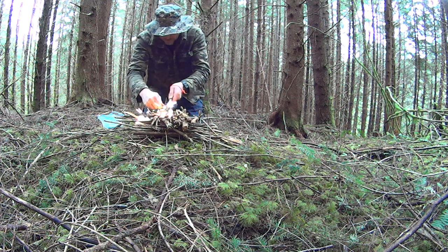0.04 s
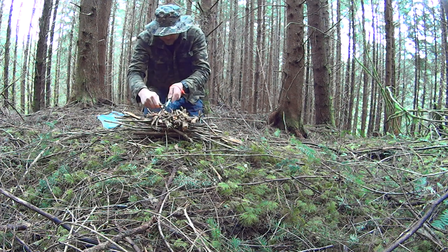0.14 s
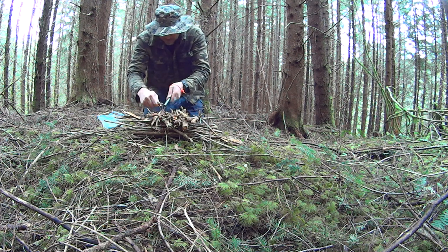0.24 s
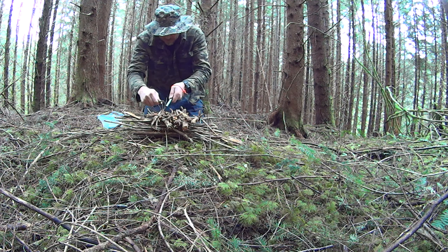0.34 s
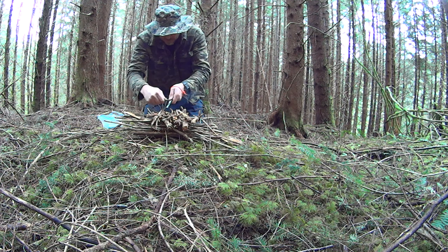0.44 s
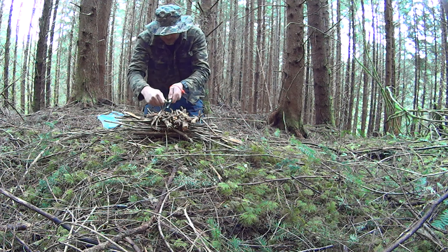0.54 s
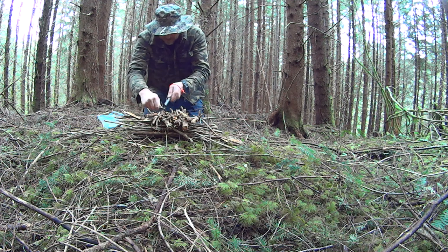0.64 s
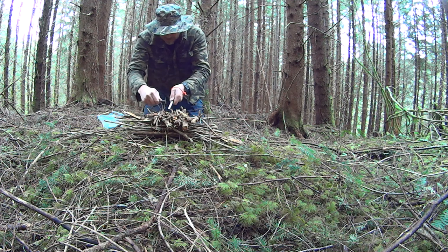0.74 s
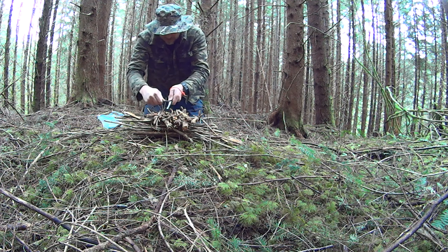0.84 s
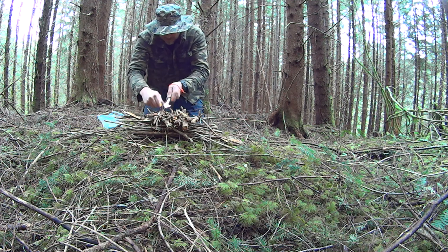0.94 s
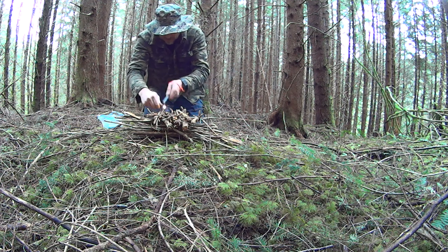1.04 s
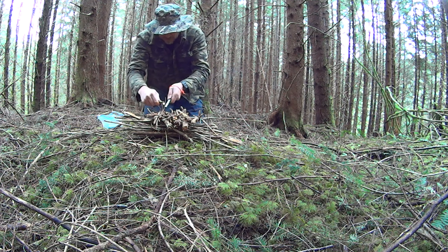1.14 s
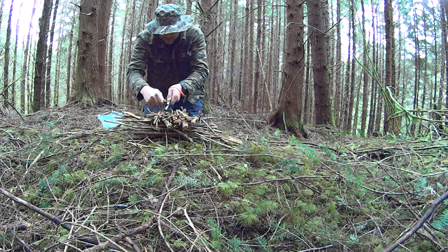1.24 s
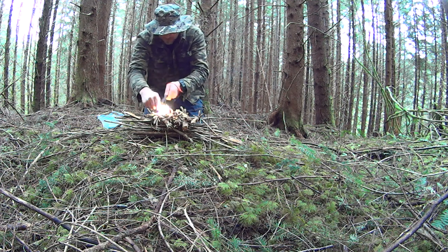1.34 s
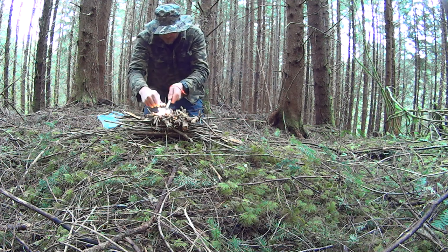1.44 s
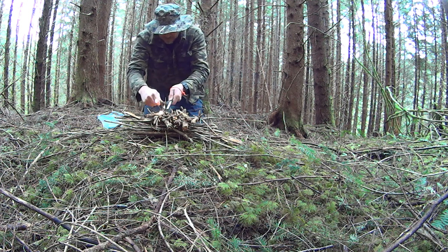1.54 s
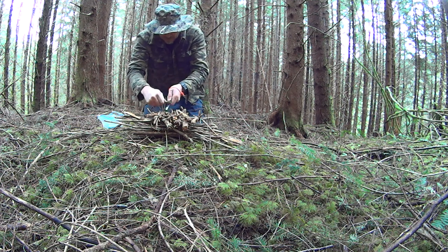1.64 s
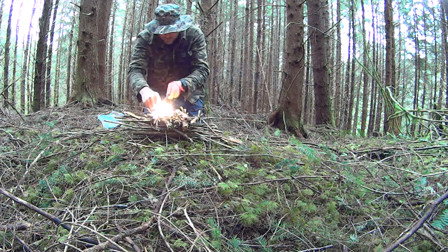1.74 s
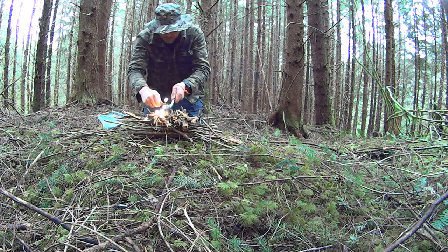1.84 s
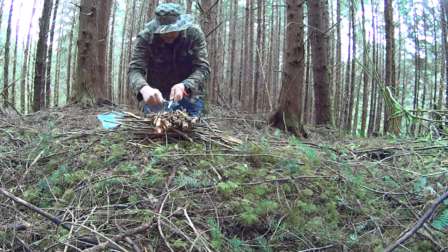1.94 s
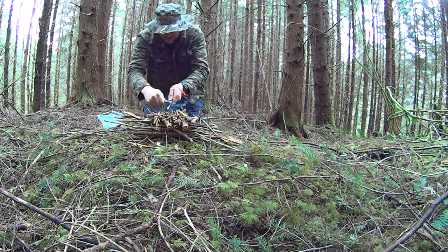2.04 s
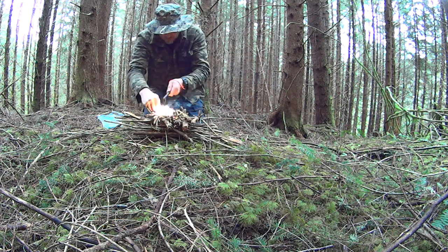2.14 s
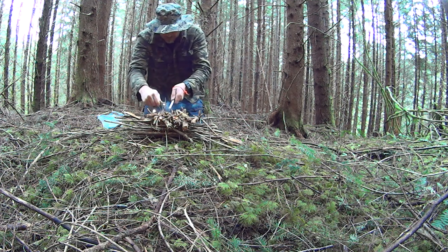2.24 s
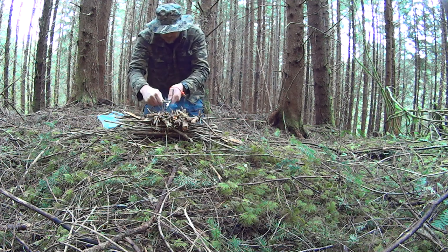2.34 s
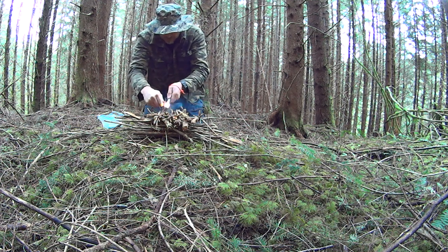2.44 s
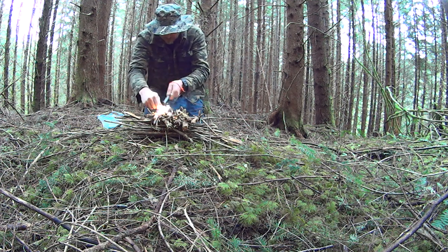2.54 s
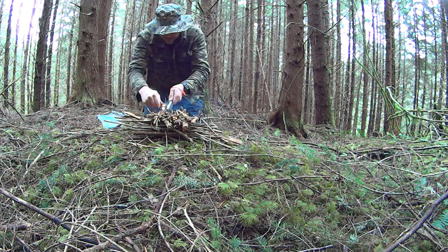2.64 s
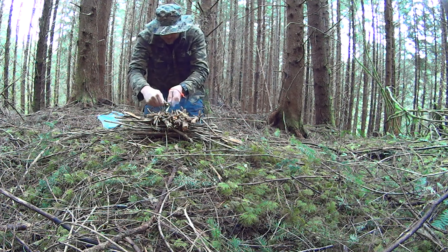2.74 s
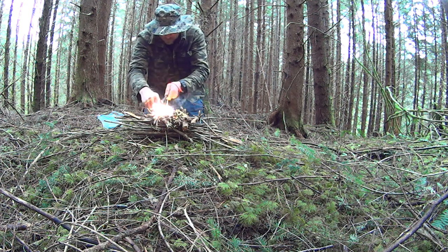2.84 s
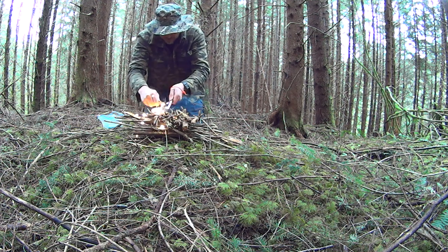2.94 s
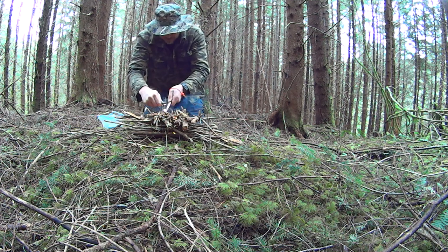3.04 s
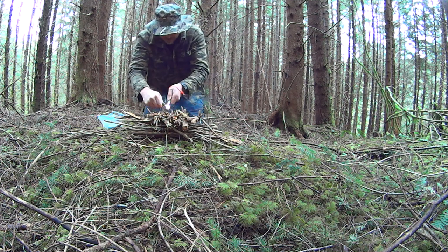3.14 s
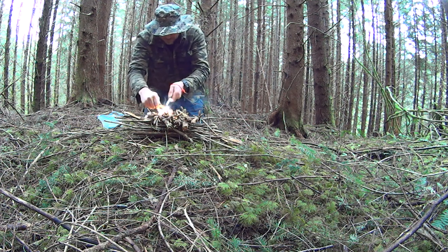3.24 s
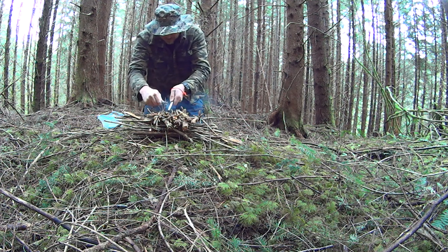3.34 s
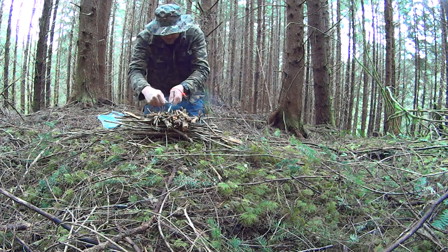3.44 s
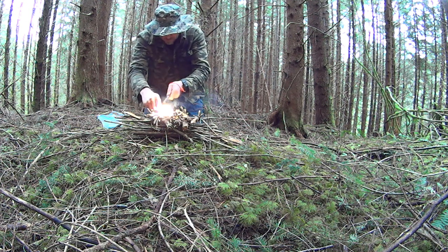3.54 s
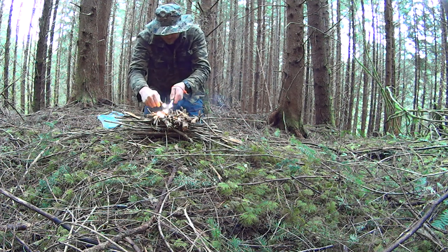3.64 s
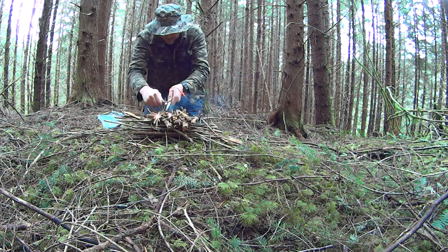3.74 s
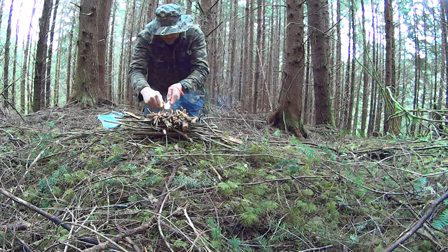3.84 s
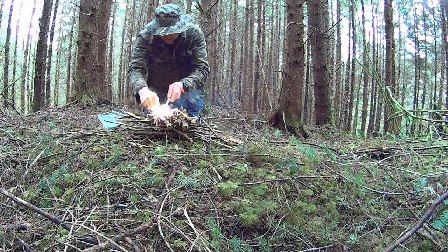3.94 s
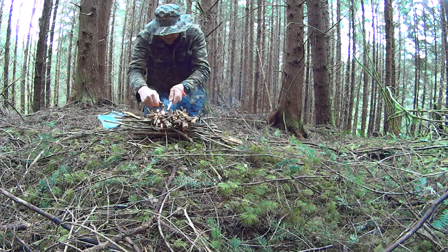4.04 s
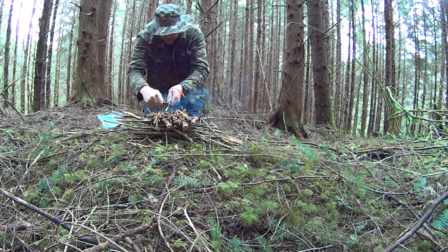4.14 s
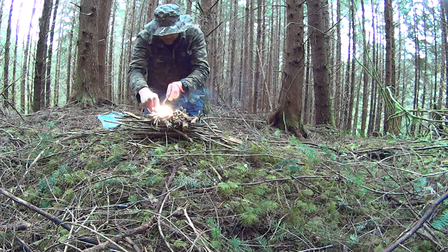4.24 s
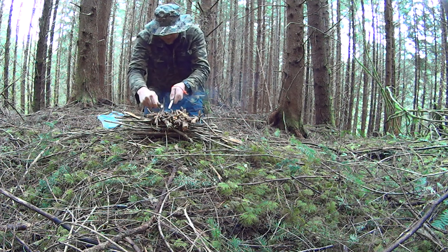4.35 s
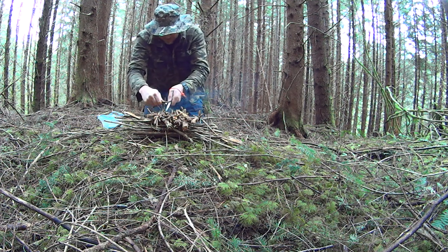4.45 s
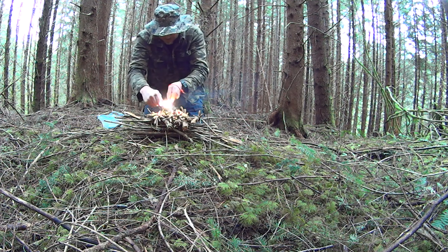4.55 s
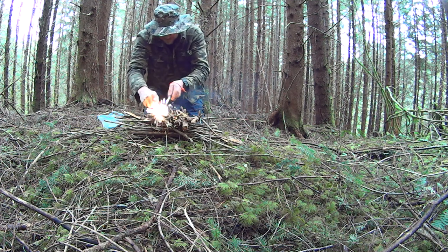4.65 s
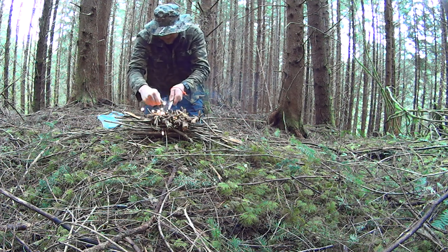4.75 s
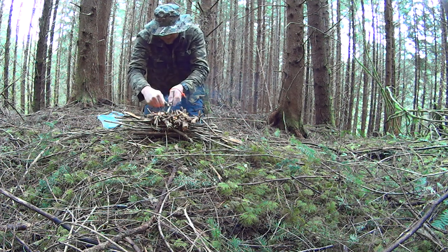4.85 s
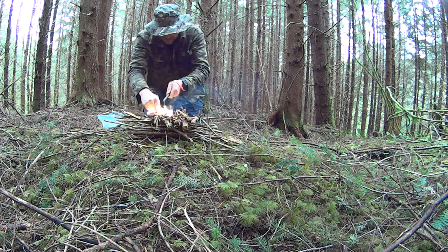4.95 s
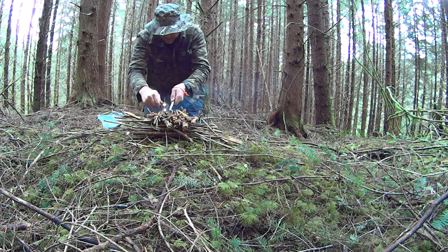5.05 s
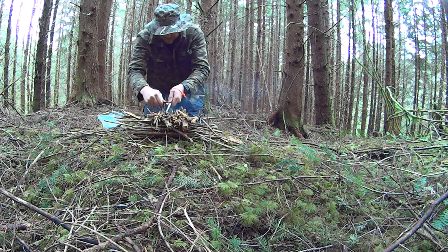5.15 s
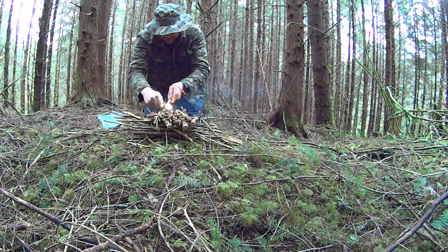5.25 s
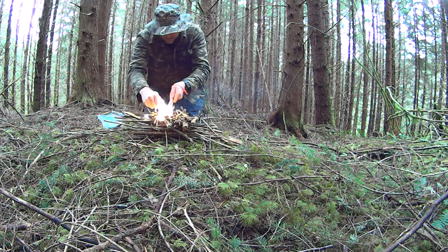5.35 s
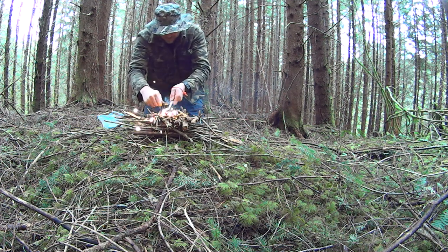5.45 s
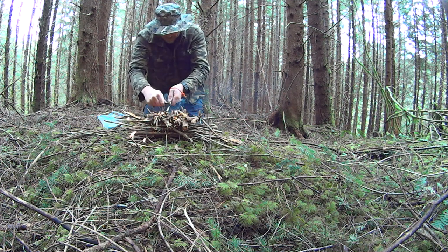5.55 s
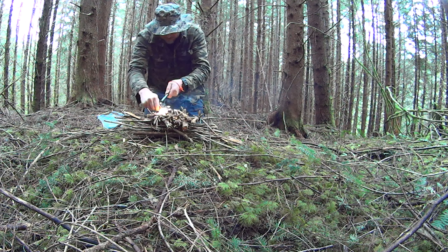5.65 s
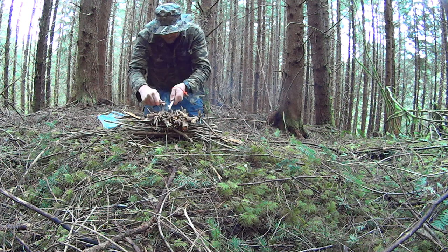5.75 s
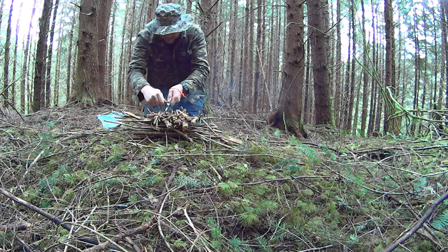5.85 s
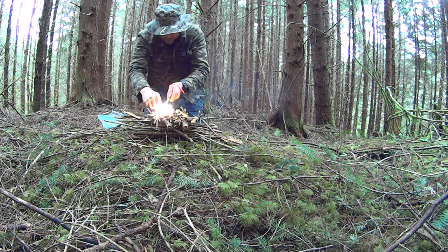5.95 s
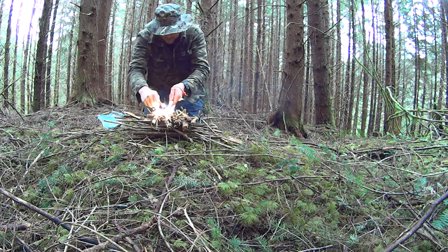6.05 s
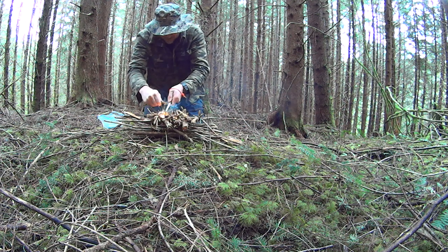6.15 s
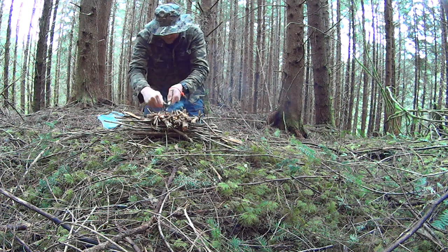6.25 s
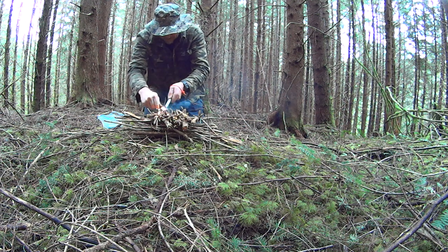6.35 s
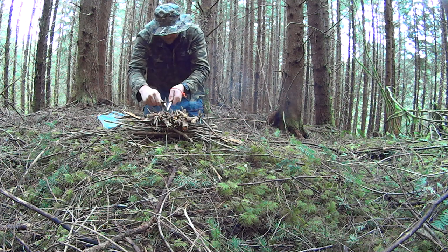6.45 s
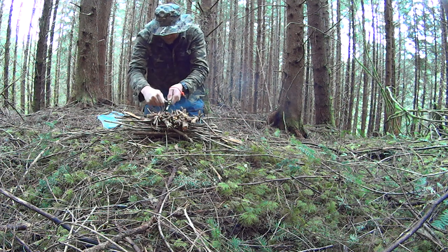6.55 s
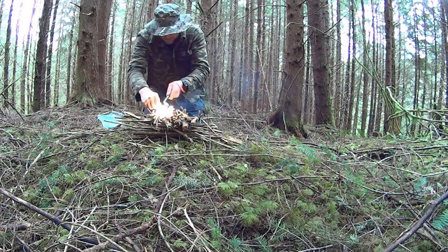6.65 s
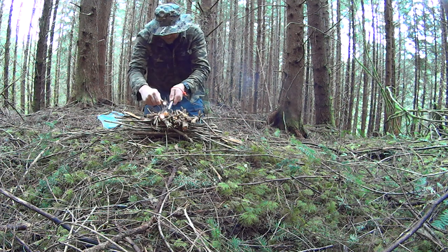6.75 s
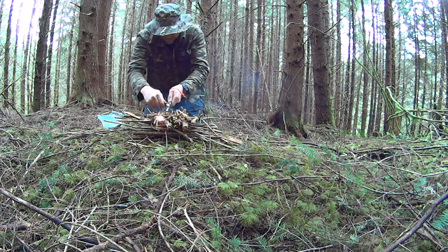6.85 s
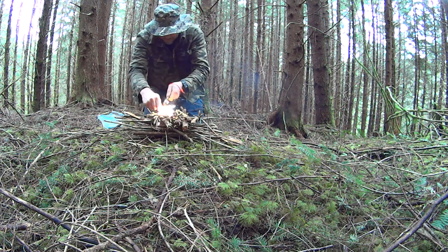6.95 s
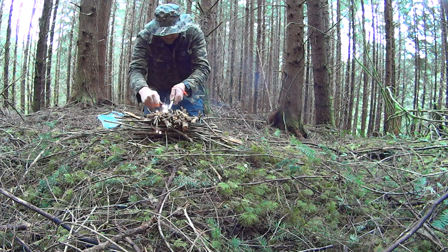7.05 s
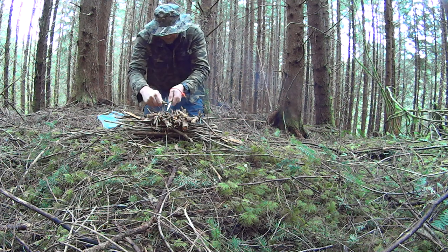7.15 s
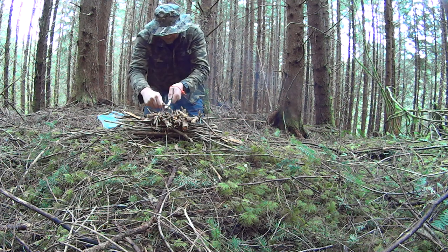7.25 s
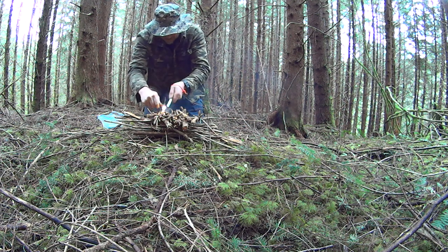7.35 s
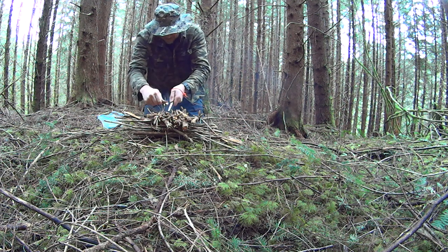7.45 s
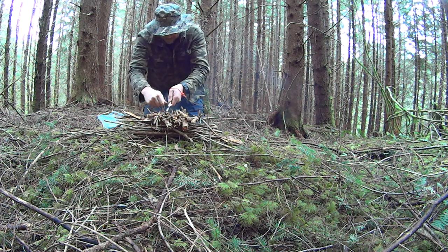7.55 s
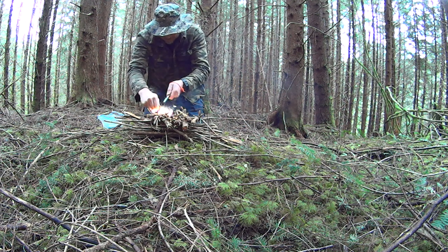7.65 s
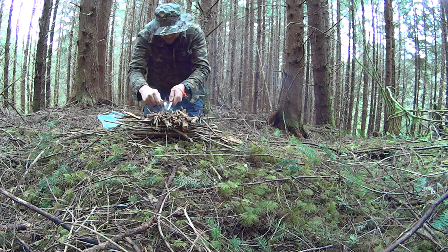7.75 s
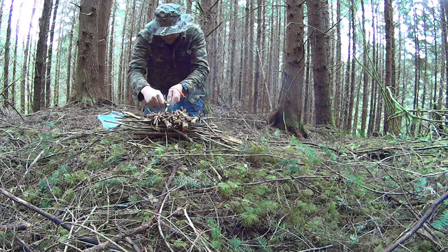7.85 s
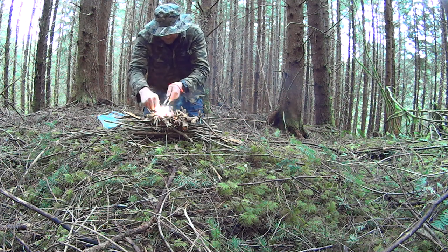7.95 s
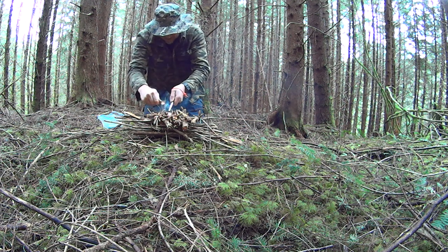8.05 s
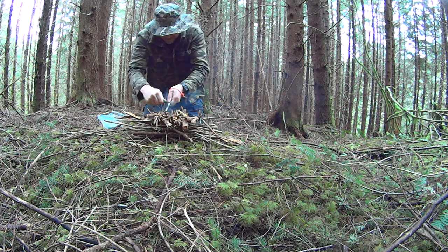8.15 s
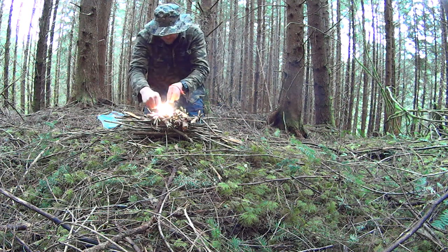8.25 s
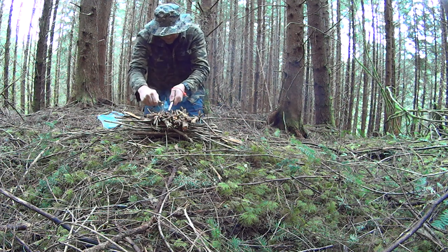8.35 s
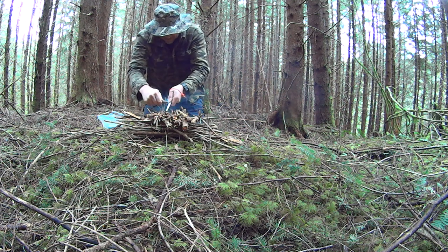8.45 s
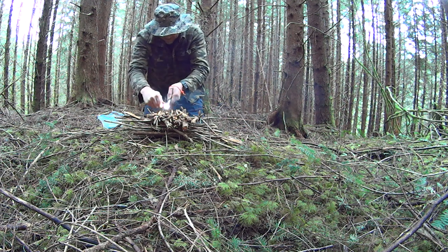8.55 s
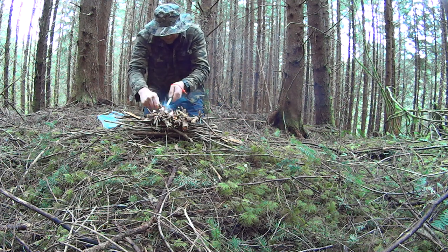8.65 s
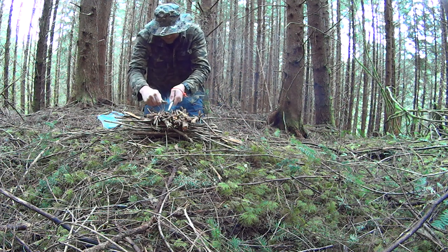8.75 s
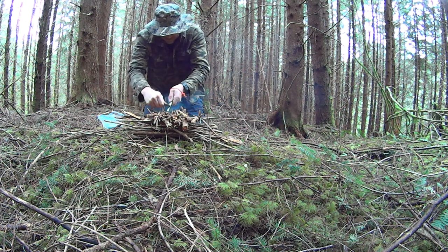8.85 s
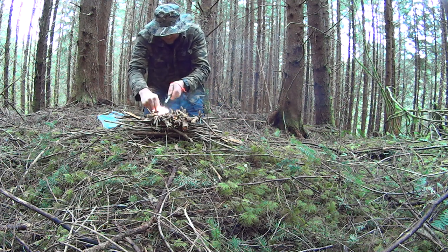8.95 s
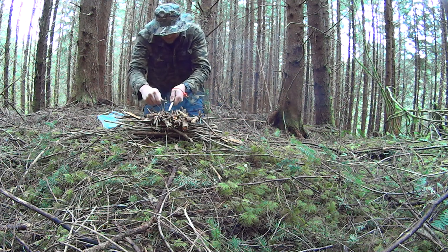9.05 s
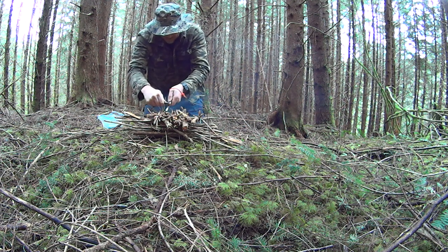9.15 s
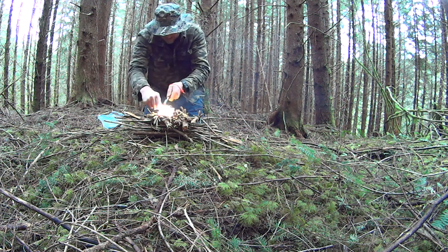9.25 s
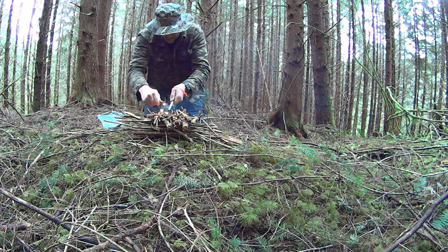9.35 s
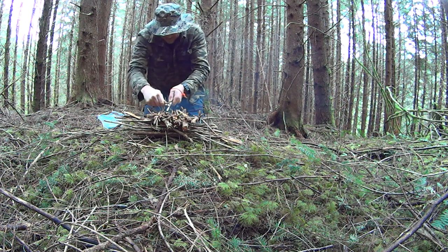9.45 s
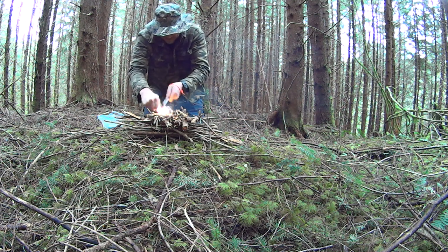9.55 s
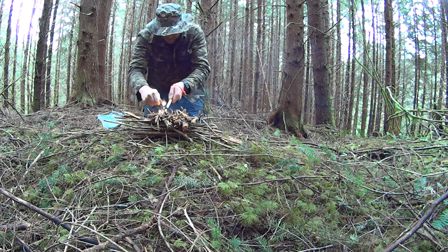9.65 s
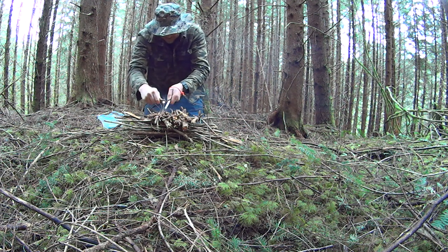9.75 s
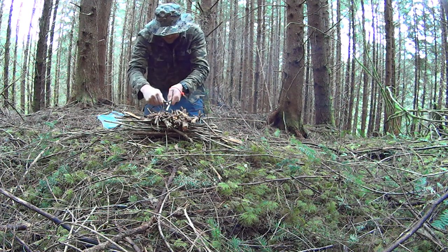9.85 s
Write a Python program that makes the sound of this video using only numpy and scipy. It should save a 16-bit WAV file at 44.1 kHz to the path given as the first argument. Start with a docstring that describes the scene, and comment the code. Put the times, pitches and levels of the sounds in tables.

```python
"""Quiet conifer wood: a steel striker is scraped down a ferrocerium rod about three times a second.
Each stroke: the steel taps onto the rod (struck partials), slides (soft grains through a steel resonance),
bites (dense grains through rod resonances, plus a stick-slip squeak), and the shavings flare in a
crackling puff of noise. Stray sparks tick as decaying noise, the ground and trunks answer faintly,
and the forest hushes behind it all as wide, nearly steady noise."""
import sys
import numpy as np
from scipy import signal
from scipy.fft import rfft, irfft, next_fast_len
from scipy.io import wavfile
from scipy.ndimage import uniform_filter1d, map_coordinates

SR = 44100
rng = np.random.default_rng(int(sys.argv[2]) if len(sys.argv) > 2 else 0)


def int16_out(signal):
    """Quantize to a 16-bit WAV file."""
    q = np.round(np.clip(np.atleast_2d(signal).T, -1, 1) * 32767)
    wavfile.write(sys.argv[1], SR, q.astype(np.int16))


N = 436590
TIME_S = np.arange(N) / SR

# Forest hush spectrum. Each row: frequency in Hz, relative level in dB.
FOREST_SPECTRUM = [(12, -55), (20, -13), (64, -3), (393, -7), (499, -2), (1140, -7.5), (1300, -4.5),
                   (1410, -9), (1790, -8), (2150, -11), (2400, -12.5), (3870, -16), (5610, -20),
                   (10600, -23), (11500, -50), (15000, -79), (22000, -120)]
# Forest stereo width. Each row: frequency in Hz, left-right correlation from 0 to 1.
FOREST_CORRELATION = [(60, 1), (140, 0.84), (350, 0.68), (840, 0.094), (2020, 0.16), (4860, 0.049),
                      (11700, 0.59)]
# Reverberation among the trunks. Each row: frequency in Hz, 60 dB decay time in seconds.
TRUNK_DECAY = [(300, 0.72), (4500, 0.38), (11000, 0.22)]
# Stereo level of the work. Each row: frequency in Hz, left minus right in dB.
LEFT_LEAN = [(350, .3), (2000, 1.7), (4200, 1.3), (8500, 1.8)]
# Stereo phase of the work. Each row: frequency in Hz, lead of the left channel in radians.
LEFT_LEAD = [(100, 0), (900, 0.63), (2400, 0.37), (4500, 0.33), (7000, 0.49), (11000, 0.25)]
# Sparks that pop, or fizz on in the tinder. Each row: start in seconds, nominal peak in dB,
# 60 dB decay time in seconds.
LOUD_SPARKS = [(.114, -29, 0.019), (.13, -34.5, 0.065), (.666, -28.5, 0.0098), (1.088, -33.5, .015),
               (1.363, -16.5, .02), (1.529, -30, 0.016), (1.888, -30, .015), (1.908, -27.5, 0.022),
               (2.849, -16.5, .015), (2.961, -30.5, 0.12), (3.643, -28, 0.019), (4.022, -31.5, .22),
               (4.073, -26.5, .015), (4.944, -14, .015), (5.408, -32.5, 0.091), (5.466, -30, 0.047),
               (6.509, -29, 0.011), (7.791, -28.5, 0.022), (7.909, -30, .01), (8.009, -26, .025),
               (8.031, -26, 0.0097), (8.98, -31, 0.13)]
# Burning shavings spectrum. Each row: frequency in Hz, relative level in dB.
BURN_SPECTRUM = [(30, -15), (90, -8.5), (180, -5.5), (320, -6.5), (540, -0.5), (720, -10.5), (950, -7.5),
                 (1600, -3.5), (2300, -1), (2900, -3), (3700, 0.5), (5800, -3.5), (6450, -7.5),
                 (7000, -3.5), (9000, -2), (11000, -4)]
# Light sliding spectrum. Each row: frequency in Hz, relative level in dB.
SLIDE_SPECTRUM = [(1200, -16), (2300, -3), (3500, -7), (4500, -8), (4900, -6), (5600, -13), (6400, -18),
                  (7300, -6), (8900, -9), (11000, -5.5)]
# Steel set down on the rod. Each row: start in seconds, ring level in dB, edge level in dB.
TAP_EVENTS = [(.083, -43.5, -44), (0.4856, -22.5, -26.5), (0.6157, -36, -42), (.894, -31, -34.5),
              (.986, -32, -34), (1.2647, -20.5, -26.5), (1.664, -24, -29.5), (2.0462, -21.5, -30.5),
              (2.4064, -20, -30.5), (2.7721, -25.5, -34.5), (3.1165, -22.5, -33), (3.207, -35, -32),
              (3.463, -23.5, -24.5), (3.8227, -24, -21.5), (4.1797, -20, -27), (4.5157, -20.5, -26),
              (4.8655, -19, -25), (5.2125, -20.5, -22), (5.5564, -20, -23.5), (5.888, -20, -22),
              (6.2389, -21.5, -22.5), (6.5509, -21, -21), (6.8853, -20.5, -28), (7.2178, -20, -26.5),
              (7.5467, -24, -21), (7.8705, -19, -23.5), (8.197, -21, -22), (8.526, -20, -24.5),
              (8.846, -20.5, -25.5), (9.182, -19.5, -27.5), (9.489, -22.5, -29), (9.675, -24.5, -23),
              (9.872, -19, -23)]
# Dull knock of the rod under each tap. Each row: frequency in Hz, relative level in dB.
KNOCK_SPECTRUM = [(200, -31), (1400, -16), (1850, -8.5), (2040, -15.5), (2270, 2.5), (2550, -9.5),
                  (2850, -2.5), (3100, -10.5), (3300, -0.5), (3620, 6.5), (3820, -5), (4050, 7),
                  (4500, -24), (6000, -17), (11000, -53)]
# Hand-damped steel and rod. Each row: frequency in Hz, relative level in dB.
RING_SPECTRUM = [(3000, -44.5), (4000, -18), (4380, 10), (4800, 12.5), (5130, 5.5), (5350, -9), (6300, -17),
                 (11000, -57)]
# Brighter contact edge. Each row: frequency in Hz, relative level in dB.
EDGE_SPECTRUM = [(3000, -38), (6350, -24), (6950, 2.5), (8200, 2.5), (8750, 10.5), (9600, -6), (10600, 5.5),
                 (12000, -24.5)]
# Squeak pitch, drifting with the grip. Each row: time in seconds, pitch in Hz before glide and jitter.
SQUEAK_PITCH = [(5.6, 2380), (5.95, 2219), (7.28, 2290), (7.61, 2615), (8.26, 2284), (8.59, 2285),
                (8.91, 2447), (9.25, 2209)]
# Pushes down the rod. Each row: bite in seconds, force in dB, delay from bite to flare in seconds,
# flare level in dB before trim, burn-out in seconds.
PUSHES = [(-.03, -44, 0.018, -33, 0.034), (.578, -41, 0.037, -42.5, 0.0043), (.962, -47, 0.033, -31, 0.011),
          (1.339, -39, 0.046, -33, 0.03), (1.741, -36.5, 0.024, -29.5, .023),
          (2.112, -33, 0.027, -30, .025), (2.475, -40.5, 0.027, -32, 0.034),
          (2.838, -33.5, 0.035, -30, 0.024), (3.185, -39, .025, -28, 0.018),
          (3.526, -35, 0.038, -32.5, 0.025), (3.885, -31, 0.022, -29, 0.024),
          (4.24, -35.5, 0.031, -32, 0.018), (4.577, -34.5, 0.022, -30, 0.037),
          (4.922, -33, 0.019, -32.5, 0.032), (5.276, -32, 0.025, -30.5, 0.04),
          (5.617, -25.5, 0.021, -30, 0.023), (5.947, -26.5, 0.019, -30, 0.041),
          (6.297, -27, 0.016, -33, 0.026), (6.617, -25, .04, -32, 0.042),
          (6.944, -27.5, 0.014, -28.5, 0.029), (7.279, -26.5, 0.021, -32, 0.02),
          (7.61, -22.5, 0.022, -30, 0.02), (7.937, -20.5, 0.017, -28, 0.015),
          (8.26, -21.5, 0.026, -28.5, 0.016), (8.587, -20, 0.025, -28.5, 0.013),
          (8.906, -20, .034, -31.5, .013), (9.246, -24, 0.013, -31.5, .022),
          (9.56, -20.5, 0.02, -31.5, .026)]
# Brief snags of the edge before it bites. Each row: time in seconds, level in dB.
SNAG_EVENTS = [(.949, -39), (2.805, -35.5), (3.503, -30), (4.56, -38), (6.598, -41)]
# Rod resonances while the edge is pressed in. Each row: centre in Hz, width in Hz, relative level in dB.
ROD_MODES = [(1720, 500, -4), (2278, 190, 9.5), (2620, 420, 2), (2780, 46, 5.5)]
# Grit of the tearing edge. Each row: frequency in Hz, relative level in dB.
GRIT_SPECTRUM = [(1820, -29), (3100, -4.5), (3540, -7), (4010, -2), (4430, -13.5), (4860, 2), (5450, -9.5),
                 (6220, -14.5), (6870, -8.5), (8010, -11.5), (9080, -7), (9920, -8.5), (11000, -13.5),
                 (11300, -43), (11500, -30), (15000, -79), (22000, -120)]

# *_GROWS: dB of level per dB of force (for the knock, per dB of ring).
TOP_HZ = 11130
FOREST_DB = -52.5
STRAY_DB, STRAY_SPREAD_DB, STRAY_FLIGHT_S = -41.5, 2.5, (.04, .13)
FLARE_TRIM_DB, KINDLE = 1.5, .44  # KINDLE: rise time as a share of the delay from bite to flare
HARD_DB = -22.5  # force of a hard push, reference for the levels below
SLIDE_DB, SLIDE_GROWS, SLIDE_LEAD_S = -41, .42, .018
SLIDE_RISE_S, SLIDE_FALL_S = .017, .015
SING_HZ, SING_WIDTH_HZ, SING_DB, SING_RISE_S = 4870, 300, -54, .015
FIRM_TAP_DB, KNOCK_DB, KNOCK_GROWS = -18.5, -30.5, .35
SQUEAK_DB, OVERTONES_DB, SQUEAK_GROWS = -25, -9.5, 1.26
BITE_S, BITE_HALVES_DB, BITE_RELEASE = .00485, 17, .9  # hard half-width, force that halves it, fall / rise
BODY_DB, GRIT_DB, GRIT_GROWS = -3, -27.5, .88  # BODY_DB: rod resonance relative to the force
GRIT_RISE, GRIT_FALL = 1, 1.36  # times the bite's half-width
SNAG_RISE_S, SNAG_FALL_S = .0015, .0076


def amp(db):
    """Decibels to gain."""
    return 10 ** (np.asarray(db) / 20)


def unit(x):
    """Scale to rms 1."""
    return x / np.sqrt(np.mean(x ** 2) + 1e-20)


def along(points, hz):
    """Interpolate (Hz, value) points on a log frequency axis."""
    f, v = np.transpose(points)
    return np.interp(np.log(hz + 1), np.log(f + 1), v)


def filtered(x, response):
    """Apply a complex response of frequency."""
    size = next_fast_len(N + SR // 2)
    return irfft(rfft(x, size) * response(np.fft.rfftfreq(size, 1 / SR)), size)[..., :N]


def coloured(x, spectrum):
    """Shape x by a (Hz, dB) spectrum, at rms 1."""
    return unit(filtered(x, lambda hz: amp(along(spectrum, hz))))


def resonance(hz, centre_hz, width_hz):
    """Second-order band-pass response, peak 1."""
    damping = 1j * hz * width_hz
    return damping / (centre_hz ** 2 - hz * hz + damping)


def wobble(knots_per_s):
    """Smooth random curve."""
    knots = rng.standard_normal(N // 8)
    return map_coordinates(knots, [TIME_S * knots_per_s], mode="mirror")


def add(track, start_s, sound):
    """Mix a sound into a track."""
    start = max(round(start_s * SR), 0)
    room = track[start:start + len(sound)]
    room += sound[:len(room)]


def swells(rows):
    """Gain curve of smooth humps (s, dB, rise s, fall s) whose powers add."""
    power = np.zeros(N)
    for s, db, rise_s, fall_s in rows:
        near = slice(*np.searchsorted(TIME_S, [s - 10 * abs(rise_s), s + 10 * abs(fall_s)]))
        t = TIME_S[near] - s
        power[near] += (amp(db) / np.cosh(t / np.where(t < 0, rise_s, fall_s))) ** 2
    return np.sqrt(power)


def grains(rate_hz, spread_db, hiss):
    """Random tiny impulses of uneven size over a smooth hiss, at rms 1."""
    hits = (rng.random(N) < rate_hz / SR) * np.sign(rng.standard_normal(N))
    sizes = amp(spread_db * np.clip(rng.standard_normal(N), -2, 2))
    return unit(unit(hits * sizes) + hiss * rng.standard_normal(N))


def struck(spectrum, chatter, settle_s, stretch, uneven_db):
    """One contact: impulse and decaying chatter through a minimum-phase colour, rms 1 over 5 ms."""
    size = 2048
    hz = np.fft.rfftfreq(size, 1 / SR) * (1 + stretch * rng.standard_normal())  # the grip retunes the steel
    # each contact spot favours other partials
    spot = map_coordinates(rng.standard_normal(100), [hz / 450], mode="mirror")
    cepstrum = irfft(np.log(amp(along(spectrum, hz) + uneven_db * spot)))
    cepstrum[1:size // 2] *= 2  # fold to causal
    cepstrum[size // 2 + 1:] = 0
    force = chatter * rng.standard_normal(size) * np.exp(-np.arange(size) / SR / settle_s)
    force[0] += 1
    sound = irfft(np.exp(rfft(cepstrum)) * rfft(force))
    return sound / np.sqrt(np.mean(sound[:SR // 200] ** 2))


def bite_width_s(force_db):
    """Half-width of a bite: the harder the push, the shorter."""
    return BITE_S * 2 ** ((HARD_DB - force_db) / BITE_HALVES_DB)


def forest():
    """Distant air in the treetops: nearly steady noise, its stereo correlation set per frequency."""
    mid_side = rng.standard_normal((2, N))

    def widen(hz):
        angle = np.arccos(np.clip(along(FOREST_CORRELATION, hz), -1, 1)) / 2
        return np.array([np.cos(angle), np.sin(angle)])

    mid, side = filtered(mid_side, widen)
    air = coloured(np.array([mid + side, mid - side]), FOREST_SPECTRUM)
    return air * amp(FOREST_DB) * amp(wobble(2.99) / 2)


def trunks(x):
    """Two near reflections, and a thin decaying noise tail scattered among the trees."""
    hz, t, z = signal.stft(rng.standard_normal((2, SR // 2)), SR, nperseg=256)
    decay = amp(-60 * t / along(TRUNK_DECAY, hz)[:, None])
    tail = signal.istft(z * decay, SR, nperseg=256)[1]
    mid, side = tail / np.linalg.norm(tail[0]) * amp([[-25], [-26]])
    scatter = signal.fftconvolve(x[None], np.array([mid + side, mid - side]), axes=1)[:, :N]
    near = [(.0083, -32), (.0178, -28)]  # s, dB
    return scatter + sum(amp(db) * np.pad(x, (round(s * SR), 0))[:N] for s, db in near)


def ground(x):
    """The mossy bank adds a close second copy and soaks up its treble."""
    delay_s = .0027
    moss = lambda hz: .35 / np.sqrt(1 + (hz / 5000) ** 8)
    return x + filtered(x, lambda hz: moss(hz) * np.exp(-2j * np.pi * hz * delay_s))


def sparks(strays_per_flare, t60_s):
    """Single specks pop or fizz as decaying noise: the loud ones, and faint strays flying from each flare."""
    strays = []
    for s, _, delay_s, *_ in PUSHES:
        for _ in range(strays_per_flare):
            start_s = s + delay_s + rng.uniform(*STRAY_FLIGHT_S)
            strays.append((start_s, STRAY_DB + STRAY_SPREAD_DB * rng.standard_normal(), t60_s))
    pops = np.zeros(N)
    t = np.arange(SR // 6) / SR
    crest_db = 5.5  # allowance from noise rms to peak
    for s, db, life_s in LOUD_SPARKS + strays:
        add(pops, s, amp(db - crest_db - 60 * t / life_s) * rng.standard_normal(len(t)))
    return filtered(pops, lambda hz: 1j * hz / (2200 + 1j * hz))  # high-pass


def flares():
    """Hundreds of burning specks merge into a sputtering puff after each bite."""
    sputter = amp(1.8 * wobble(220) + 1.4 * wobble(80))
    burning = unit(grains(rate_hz=5000, spread_db=4, hiss=.57) * sputter)
    blaze = swells([(s + delay_s, db, KINDLE * delay_s, burn_out_s)
                    for s, _, delay_s, db, burn_out_s in PUSHES])
    return coloured(burning, BURN_SPECTRUM) * amp(FLARE_TRIM_DB) * blaze


def slides():
    """Before each bite the edge slides lightly, its grains keeping a steel resonance singing."""
    rubbing = coloured(grains(rate_hz=1200, spread_db=5, hiss=.4), SLIDE_SPECTRUM)
    sliding = unit(rubbing * amp(3 * wobble(160)))
    contact = swells([(s - SLIDE_LEAD_S, SLIDE_DB + SLIDE_GROWS * (force_db - HARD_DB),
                       SLIDE_RISE_S, SLIDE_FALL_S) for s, force_db, *_ in PUSHES])
    singing = unit(filtered(sliding, lambda hz: resonance(hz, SING_HZ, SING_WIDTH_HZ)))
    touch = swells([(s - SLIDE_LEAD_S, SING_DB, SING_RISE_S, SLIDE_FALL_S) for s, *_ in PUSHES])
    return sliding * contact + singing * touch


def taps():
    """The steel lands on the rod: dull knock, hand-damped ring and bright edge in one short contact."""
    out = np.zeros(N)
    build_up_s, settle_s = .0004, .0008
    for s, ring_db, edge_db in TAP_EVENTS:
        knock_db = KNOCK_DB + KNOCK_GROWS * (ring_db - FIRM_TAP_DB)
        knock = struck(KNOCK_SPECTRUM, .08, settle_s, stretch=.016, uneven_db=2.8)
        ring = struck(RING_SPECTRUM, .06, settle_s, stretch=.012, uneven_db=2.2)
        edge = struck(EDGE_SPECTRUM, .16, settle_s, stretch=.012, uneven_db=1.8)
        add(out, s - build_up_s, amp(knock_db) * knock + amp(ring_db) * ring + amp(edge_db) * edge)
    return out


def squeaks(glide, jitter):
    """Stick-slip tone in each bite, faint in light ones; pitch sags where the pressure is greatest."""
    out = np.zeros(N)
    t = np.arange(-SR // 25, SR // 25) / SR
    for s, force_db, *_ in PUSHES:
        width_s = bite_width_s(force_db)
        waver = unit(uniform_filter1d(rng.standard_normal(len(t)), size=40))
        detune = .0247 * rng.standard_normal()
        sag = glide * np.tanh(t / (2 * width_s)) ** 2
        pitch_hz = np.interp(s, *np.transpose(SQUEAK_PITCH)) * (1 + detune + sag + jitter * waver)
        phase = 2 * np.pi * np.cumsum(pitch_hz) / SR
        tone = np.sin(phase) + amp(OVERTONES_DB) * sum(np.sin(k * phase) for k in range(2, 5))
        level_db = SQUEAK_DB + SQUEAK_GROWS * (force_db - HARD_DB)
        add(out, s + t[0], amp(level_db) * tone / np.cosh(t / width_s))
    return out


def bites():
    """The edge tears off shavings, each tear kicking the pressed rod's resonances."""
    tears = unit(grains(rate_hz=2200, spread_db=3.5, hiss=.35) * amp(2 * wobble(260)))

    def rod(hz):
        modes = sum((-1) ** k * amp(db) * resonance(hz, centre_hz, width_hz)
                    for k, (centre_hz, width_hz, db) in enumerate(ROD_MODES))
        return modes / (1 + (1400 / (hz + 1)) ** 6)  # a thin rod radiates little bass

    pushes = [(s, force_db, bite_width_s(force_db)) for s, force_db, *_ in PUSHES]
    pressure = swells([(s, force_db + BODY_DB, w, BITE_RELEASE * w) for s, force_db, w in pushes])
    grit = [(s, GRIT_DB + GRIT_GROWS * (force_db - HARD_DB), GRIT_RISE * w, GRIT_FALL * w)
            for s, force_db, w in pushes]
    snags = [(s, db, SNAG_RISE_S, SNAG_FALL_S) for s, db in SNAG_EVENTS]
    tearing = swells(grit + snags)
    return unit(filtered(tears, rod)) * pressure + coloured(tears, GRIT_SPECTRUM) * tearing


def scene():
    """The fire steel works a little left of centre, among trunks and forest hush."""
    fire = flares() + sparks(strays_per_flare=2, t60_s=.019)
    scrape = slides() + taps() + squeaks(glide=.097, jitter=.036) + bites()
    work = ground(fire + scrape)
    halves = np.array([[.5], [-.5]])  # left, right share of each difference
    direct = filtered(work, lambda hz: amp(halves * along(LEFT_LEAN, hz))
                      * np.exp(1j * halves * along(LEFT_LEAD, hz)))
    return forest() + trunks(work) + direct


def record(dry):
    """Very steep low-pass at TOP_HZ."""
    return filtered(dry, lambda hz: 1 / np.sqrt(1 + (hz / TOP_HZ) ** 300))


dry = scene()
out = record(dry)
int16_out(out)
```